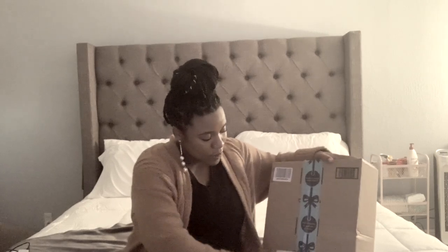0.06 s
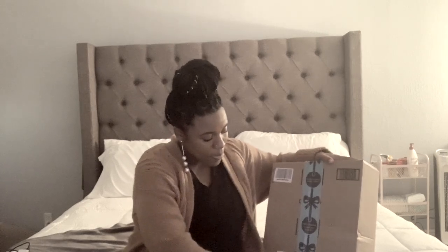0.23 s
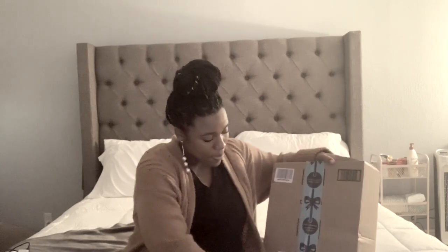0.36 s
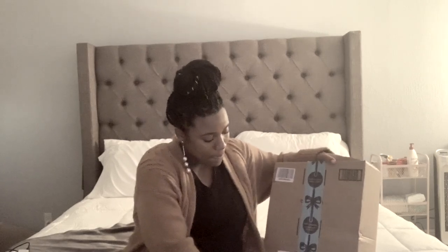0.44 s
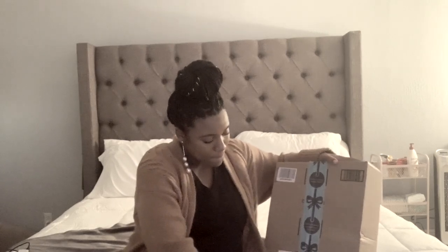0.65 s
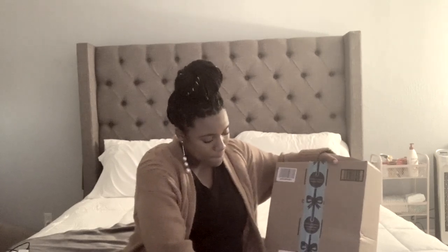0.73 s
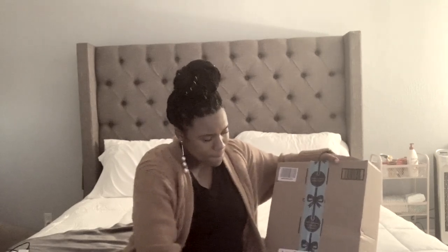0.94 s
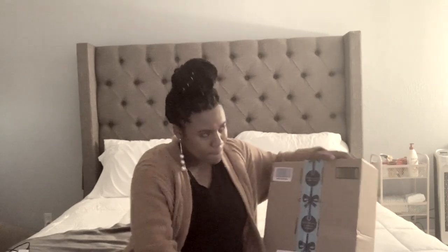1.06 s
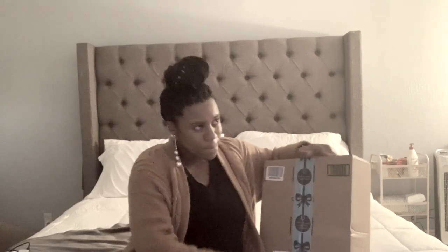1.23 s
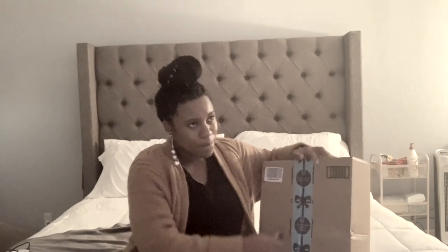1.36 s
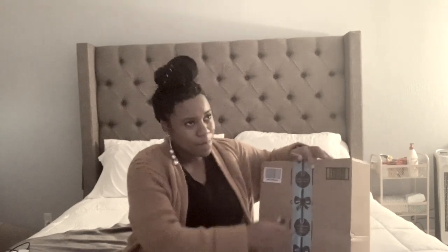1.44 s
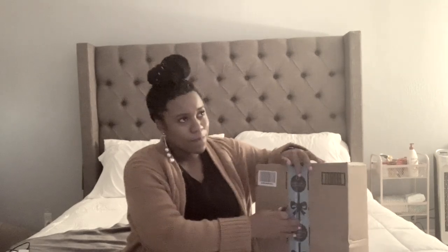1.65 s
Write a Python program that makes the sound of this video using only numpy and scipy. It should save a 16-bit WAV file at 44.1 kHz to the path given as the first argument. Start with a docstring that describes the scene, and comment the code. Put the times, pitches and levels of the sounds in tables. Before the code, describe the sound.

In a quiet bedroom, packing tape crackles loose, then rasps off a cardboard box twice, drumming its walls. Nearby stereo microphones then pick up a hand softly rubbing and knocking the box.

```python
"""A bedroom, a stereo microphone pair on a cardboard box, low room tone behind.
Packing tape is picked loose and ripped off the box in two pulls. The glue lets go in quick uneven
slips that crackle, rasp in the box and room's midrange and drum the box walls. Then a hand slides
over the cardboard and bumps it. The room answers with a short tail."""
import sys
import numpy as np
from scipy import signal
from scipy.fft import rfft, irfft, next_fast_len
from scipy.io import wavfile
from scipy.ndimage import uniform_filter1d

SR = 44100
rng = np.random.default_rng(int(sys.argv[2]) if len(sys.argv) > 2 else 0)


def output_pcm(signal):
    """Save a mono or channel-first signal as 16-bit PCM at the path in sys.argv[1].

    Samples are clipped to [-1, 1] before scaling.
    """
    pcm = np.clip(np.atleast_2d(signal).T, -1, 1) * 32767
    wavfile.write(sys.argv[1], SR, np.round(pcm).astype(np.int16))


N = 74970
TIME = np.arange(N) / SR
FILTER_HZ = np.fft.rfftfreq(8192, 1 / SR)
FFT_SIZE = next_fast_len(2 * N, True)
FFT_HZ = np.fft.rfftfreq(FFT_SIZE, 1 / SR)


def amp(db):
    """Decibels to gain."""
    return 10 ** (np.asarray(db) / 20)


def unit_rms(x):
    """Scales to rms 1."""
    return x / np.sqrt(np.mean(x ** 2) + 1e-20)


def read(points, hz):
    """Reads a table on a log-frequency axis."""
    freq_hz, value = np.transpose(points)
    return np.interp(np.log(hz + 1), np.log(freq_hz + 1), value)


def levels(table):
    """One gain curve over time for each dB column, silent outside the table."""
    time_s, *columns = np.transpose(table)
    return np.array([amp(np.interp(TIME, time_s, db, left=-200, right=-200)) for db in columns])


def colour(x, gain):
    """Causal filter of unit energy, shaped like gain on FILTER_HZ."""
    log_gain = np.log(np.maximum(unit_rms(gain), 1e-5))
    mirrored = np.concatenate([log_gain, log_gain[-2:0:-1]])
    minimum_phase = np.exp(np.conj(signal.hilbert(mirrored)))
    taps = irfft(minimum_phase[:len(FILTER_HZ)])
    return signal.fftconvolve(x, taps[:len(FILTER_HZ)])[:N]


def resonances(table, skirt):
    """Gain of a set of resonances; skirt sets how steeply their flanks fall."""
    power = 0
    for hz, width_hz, db in table:
        detuning = (FILTER_HZ ** 2 - hz ** 2) / ((FILTER_HZ + 1) * width_hz)
        power += amp(db) ** 2 / (1 + detuning ** 2) ** skirt
    return np.sqrt(power)


def grains(per_s, spread_db):
    """Random clicks of uneven size."""
    size = amp(spread_db * np.clip(rng.standard_normal(N), -2, 2)) * rng.choice([-1, 1], N)
    return unit_rms(size * (rng.random(N) < per_s / SR))


# The quiet bedroom's spectrum: freq_hz, relative_db
ROOM_TONE = [(20, -12), (45, 0.5), (105, 7), (200, -9.5), (310, -2.5), (500, -12), (1000, -19),
             (1600, -21.5), (3000, -18), (7000, -28), (12000, -64), (16000, -53)]


def room_tone(level_db=-54.5):
    """Steady low background, partly shared by both microphones."""
    spectrum = amp(read(ROOM_TONE, FILTER_HZ))
    shared, left, right = [colour(noise, spectrum) for noise in rng.standard_normal((3, N))]
    return amp(level_db) * unit_rms(shared + 1.2 * np.array([left, right]))


# The bedroom's decay: freq_hz, t60_s
TAIL_DECAY = [(100, 0.58), (300, 0.37), (700, 0.2), (1600, 0.28), (5000, 0.27), (12000, 0.093)]
# Its tail against the direct sound: freq_hz, level_db
TAIL_LEVEL = [(100, -11), (250, -13), (700, -4), (1600, -7), (4000, -5), (7000, -8), (9000, -4),
              (12000, -11.5)]
# How alike the tail is at the two microphones: freq_hz, likeness_0_to_1
TAIL_LIKENESS = [(100, 0.33), (400, 0), (1500, 0), (4000, 0), (7000, 0), (8400, 1), (9400, 1), (10800, 1),
                 (12500, 0.6)]


def room_tail(delay_s=.004):
    """The bedroom's diffuse answer to a click, dying band by band."""
    hz, t, (left, other) = signal.stft(rng.standard_normal((2, SR)), SR, nperseg=256)
    t60 = read(TAIL_DECAY, hz)[:, None]
    likeness = np.clip(read(TAIL_LIKENESS, hz), 0, 1)[:, None]
    right = likeness * left + np.sqrt(1 - likeness ** 2) * other
    decay = amp(read(TAIL_LEVEL, hz)[:, None] - 60 * t / t60)
    energy_scale = np.sqrt(2 * np.log(1000) / (t60 * SR))
    _, tail = signal.istft(np.array([left, right]) * decay * energy_scale, SR, nperseg=256)
    return np.pad(tail, ((0, 0), (round(delay_s * SR), 0)))


# Phase across the microphone pair: freq_hz, left_lead_rad
MIC_PHASE = [(30, 0), (220, .7), (330, .1), (480, -1.6), (950, -2.2), (1200, -.6), (2500, -.7),
             (2900, -2.2), (4800, -3.7), (6000, -4.8), (7300, -4.2), (8300, -3.2), (9500, -3), (11000, -2),
             (12500, 0)]
# Balance across the pair: freq_hz, left_minus_right_db
MIC_BALANCE = [(60, 3), (180, -1), (340, 11), (700, 3.5), (1500, 2), (2200, 6), (4000, 9.5), (6000, 0.5),
               (12000, 0)]


def microphones(direct, tail):
    """Direct sound and room tail reach the pair, mostly louder on the left."""
    in_room = rfft(direct, FFT_SIZE) * (1 + rfft(tail, FFT_SIZE))
    side = np.array([[.5], [-.5]])
    phase = np.exp(1j * (side - .5) * read(MIC_PHASE, FFT_HZ))
    balance = amp(side * read(MIC_BALANCE, FFT_HZ))
    return irfft(in_room * phase * balance, FFT_SIZE)[:, :N]


# The hollow box's lowest modes: pitch_hz, level_db, t60_s
BOX_MODES = [(72.5, -9.5, 0.19), (146.1, 2.5, 0.14), (206, -4, 0.17), (245, -4.5, 0.13), (314, -7, 0.028),
             (398, -1.5, 0.058)]


def box_ring():
    """The hollow box booms in answer to one push."""
    return sum(amp(db - 60 * TIME / t60) * np.cos(2 * np.pi * hz * TIME) for hz, db, t60 in BOX_MODES)


# The hand moving on the box: time_s, hiss_db, murmur_db
HAND_SLIDE = [(0, -46, -50.5), (.1, -64, -48), (.28, -60, -60), (.36, -62, -73), (1.0, -70, -60.5),
              (1.09, -58, -60.5), (1.15, -47.5, -71), (1.25, -43, -58), (1.295, -43, -47),
              (1.32, -45.5, -70), (1.38, -45.5, -56.5), (1.42, -55.5, -66), (1.54, -49.5, -52.5),
              (1.575, -48, -50), (1.63, -42, -53), (1.7, -39, -56)]
# Spectrum of skin on cardboard: freq_hz, relative_db
SKIN_HISS = [(150, 6), (400, 2.5), (720, 5), (1000, -4), (1400, 5.5), (2000, 0.5), (2600, -5.5),
             (5000, 0.5), (6500, 2), (8000, -2), (9700, 2.5), (10700, 0.5), (11700, -48), (15500, -23)]


def hand(mode_width_hz=35, cutoff_hz=267):
    """Skin rubbing on cardboard: fine hiss over a murmur of the damped box."""
    hiss_gain, murmur_gain = levels(HAND_SLIDE)
    rub = grains(per_s=3500, spread_db=4.5)
    damped_box = resonances([(hz, mode_width_hz, db) for hz, db, _ in BOX_MODES], skirt=1.0)
    hiss = colour(hiss_gain * rub, amp(read(SKIN_HISS, FILTER_HZ)))
    murmur = colour(murmur_gain * rub, damped_box / (1 + (FILTER_HZ / cutoff_hz) ** 2))
    return hiss + murmur


# Resonances of the cardboard walls: pitch_hz, width_hz, relative_db
WALL_MODES = [(194.4, 54, 2.5), (253, 16, 2), (360.8, 54, -2.5), (421, 47, -0.5), (568.7, 66, 1.5),
              (591, 20, -1.5), (724, 47, 2), (813, 73, -8.5)]


def box_walls(force, skirt):
    """The cardboard walls resonate under a force."""
    return colour(force, resonances(WALL_MODES, skirt))


# Dull bumps on the box: start_s, boom_db, clack_db
BUMPS = [(0.222, -19, -5.5), (0.412, -20.5, 6), (1.592, -25, -9), (1.69, -31, -24)]


def bumps(push_s=.0011, clack_s=.0059):
    """Soft blows ring the hollow box and rattle its walls for a moment."""
    push, rattle = np.zeros((2, N))
    for start_s, boom_db, clack_db in BUMPS:
        age = np.maximum(TIME - start_s, 0)
        push += amp(boom_db) * age * np.exp(-age / push_s) / (push_s ** 2 * SR)
        rattle += amp(clack_db) * (age > 0) * np.exp(-age / clack_s) / np.sqrt(clack_s * SR)
    boom = signal.fftconvolve(push, box_ring())[:N]
    return boom + box_walls(rattle * grains(per_s=6000, spread_db=3), skirt=1.1)


# Squeaks within the pulls: centre_s, half_length_s, pitch_hz, level_db
TAPE_SQUEAKS = [(.4315, 0.0031, 1550, -10.5), (.428, .005, 6400, -21.5), (.8455, 0.0013, 7200, -22.5)]


def squeaks(roughness=.13, overtone_db=-14):
    """The tape gives way so fast that its slips merge into a brief, rough tone."""
    sound = np.zeros(N)
    for centre_s, half_length_s, hz, db in TAPE_SQUEAKS:
        waver = unit_rms(uniform_filter1d(rng.standard_normal(N), size=16))
        phase = 2 * np.pi * np.cumsum(hz * (1 + roughness * waver)) / SR
        tone = unit_rms(np.sin(phase) + amp(overtone_db) * np.sin(2 * phase))
        sound += amp(db) * np.exp(-((TIME - centre_s) / half_length_s) ** 2) * tone
    return sound


def bending_waves(x, delay_at_1khz_s=.0020225):
    """Cardboard carries treble faster than bass, so each jerk is smeared as it crosses the box."""
    lag_rad = 4 * np.pi * delay_at_1khz_s * np.sqrt(1000 * FFT_HZ)
    return irfft(rfft(x, FFT_SIZE) * np.exp(-1j * lag_rad), FFT_SIZE)[:N]


def slips(median_per_s=420, jitter=.65, spread_db=3):
    """Stick and slip: an uneven train of jerks about a steady pull."""
    gap, size = np.clip(rng.standard_normal((2, N // 20)), -2, 2)
    at = (np.cumsum(np.exp(jitter * gap)) / median_per_s * SR).astype(int)
    train = np.bincount(at[at < N], amp(spread_db * size[at < N]), N)
    train /= np.sqrt(abs(uniform_filter1d(train ** 2, size=700)) + 1e-3)  # evens out the strength
    return unit_rms(train - uniform_filter1d(train, size=500))


# The two pulls on the tape: time_s, rasp_db, walls_db, crackle_db, boom_db
PULL_ONE = [(.388, -43, -44, -47, -25), (.393, -33, -27, -31.5, -29), (.408, -32.5, -18, -31, -40),
            (.425, -18, -22.5, -20, -45), (.445, -24.5, -20, -28, -28.5), (.478, -22, -26.5, -29.5, -28),
            (.505, -25, -23.5, -30.5, -31), (.525, -46.5, -34, -36.5, -30), (.55, -69, -45.5, -49, -30),
            (.59, -63, -47, -65, -61)]
PULL_TWO = [(.647, -35.5, -61, -44, -47), (.655, -38, -36, -44, -33.5), (.678, -41, -71.5, -42.5, -32),
            (.705, -32.5, -24.5, -31.5, -35.5), (.735, -25.5, -26, -32.5, -24.5),
            (.762, -22.5, -20, -30, -54), (.797, -27.5, -33.5, -29, -26), (.824, -20, -54, -34.5, -24),
            (.842, -46, -27.5, -23, -35.5), (.868, -76, -43, -61, -35), (.9, -78, -83, -72, -42),
            (.93, -68, -74, -71, -89)]
# The tape's end is picked loose or catches: start_s, length_s, rasp_db, walls_db, crackle_db, boom_db
SHORT_RIPS = [(.001, 0.008, -43, -45.5, -48, -38), (0.048, 0.0088, -50.5, -41.5, -66, -45),
              (0.114, 0.02, -50, -45, -50.5, -48.5), (0.144, 0.019, -42.5, -32.5, -37.5, -31),
              (0.164, 0.028, -40, -30.5, -39, -35.5), (0.204, .015, -35.5, -30, -31, -52),
              (.658, 0.0064, -42, -27, -44, -32)]
# Midrange resonances of the box and room, rasping as the tape peels: pitch_hz, width_hz, relative_db
RASP_MODES = [(1300, 163, 0.5), (1472, 140, -2.5), (1523, 76, -0.5), (1680, 165, 3.5), (1796, 63, 1.5),
              (1880, 300, -10), (2020, 100, -1.5), (2232, 260, -6.5)]
# Spectrum of snapping glue: freq_hz, relative_db
GLUE_CRACKLE = [(300, -36), (1200, 3), (2600, -3), (3100, 4.5), (4000, 2.5), (5400, 4), (6600, 5),
                (8200, 2.5), (9100, 7), (10400, 8), (12000, -18), (15500, -37)]


def peeling_tape(puff_fade_s=.006):
    """Every slip of the tape jerks the box and sets off a puff of snapping glue threads."""
    effort = levels(PULL_ONE) + levels(PULL_TWO)
    for start_s, length_s, *db in SHORT_RIPS:
        effort += amp(db)[:, None] * np.exp(-(2 * (TIME - start_s) / length_s - 1) ** 4)
    rasp_gain, walls_gain, crackle_gain, boom_gain = effort
    jerks, ring = slips(), box_ring()
    puffs = unit_rms(signal.lfilter([1], [1, -np.exp(-1 / (puff_fade_s * SR))], np.maximum(jerks, 0)))
    threads = unit_rms(grains(per_s=7000, spread_db=4) * (1 + puffs))  # some snap between slips
    tug = unit_rms(jerks + 0.82 * threads)
    rasp = colour(rasp_gain * tug, resonances(RASP_MODES, skirt=1.73))
    walls = box_walls(walls_gain * tug, skirt=1.364)
    crackle = colour(crackle_gain * threads, amp(read(GLUE_CRACKLE, FILTER_HZ)))
    boom = signal.fftconvolve(boom_gain * tug, ring / np.linalg.norm(ring))[:N]
    return bending_waves(rasp + walls) + crackle + boom


def scene():
    """Tape, box and hand in the bedroom, heard from the microphone pair."""
    direct = peeling_tape() + squeaks() + bumps() + hand()
    return microphones(direct, room_tail()) + room_tone()


def record(dry):
    """The loudest peaks are softly rounded, then the highest treble is cut."""
    ceiling, cutoff_hz = .9, 15600
    rounded = dry / (1 + (dry / ceiling) ** 8) ** (1 / 8)
    lowpass = signal.firwin(511, cutoff_hz, window=("kaiser", 9), fs=SR)
    return signal.oaconvolve(rounded, lowpass[None], "same")


dry = scene()
out = record(dry)
output_pcm(out)
```